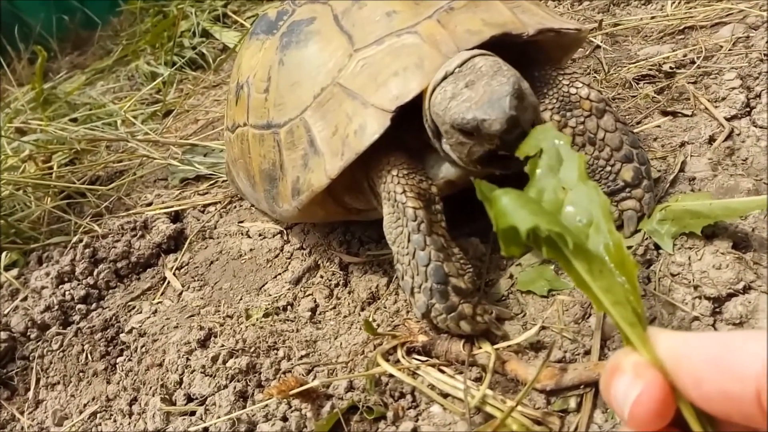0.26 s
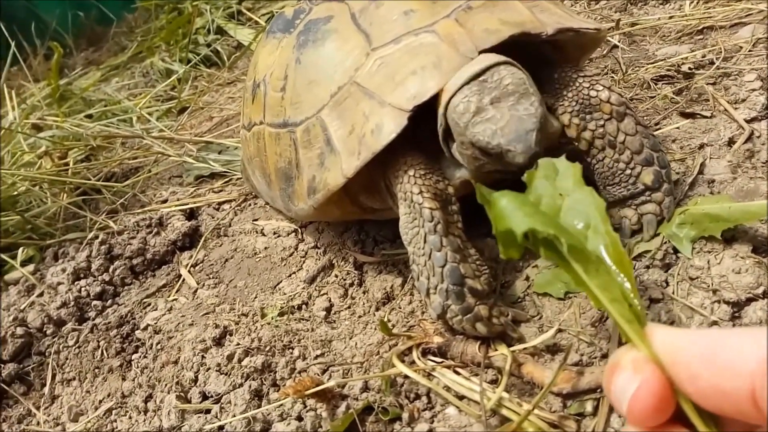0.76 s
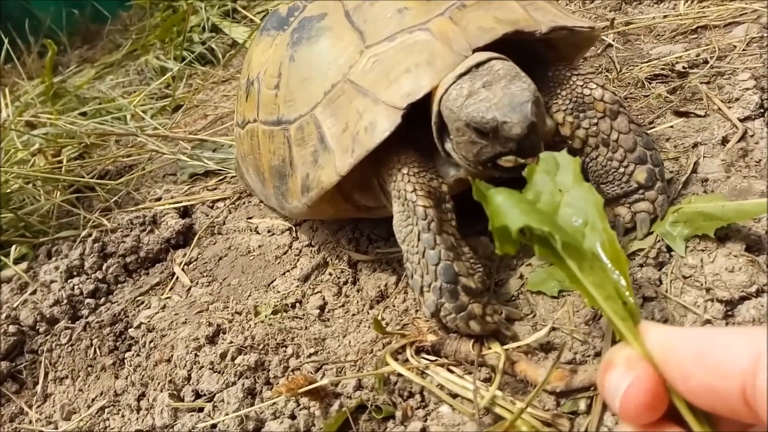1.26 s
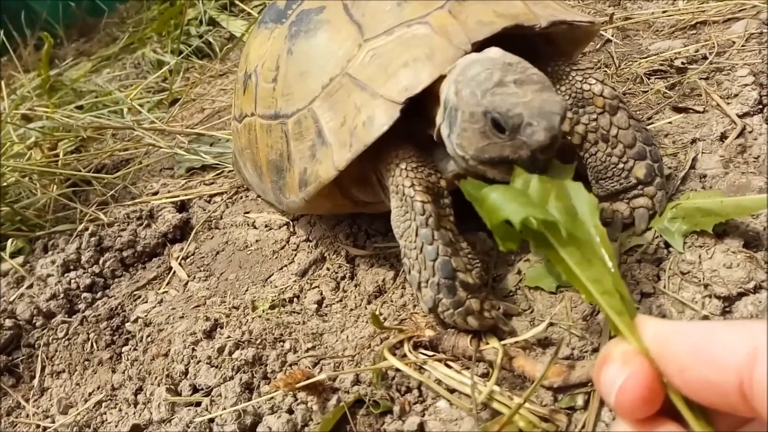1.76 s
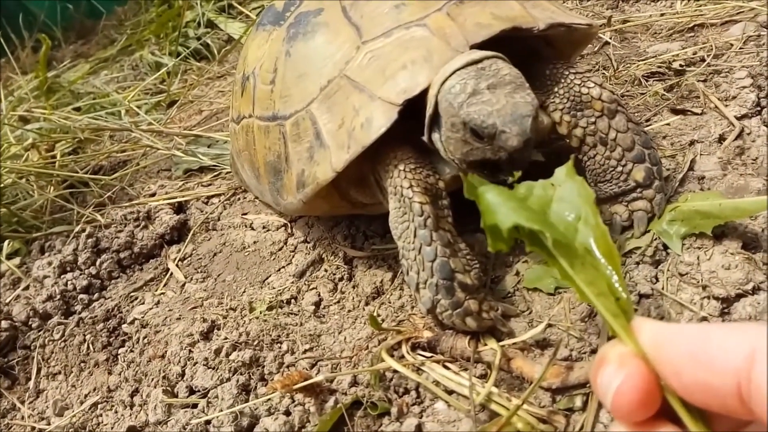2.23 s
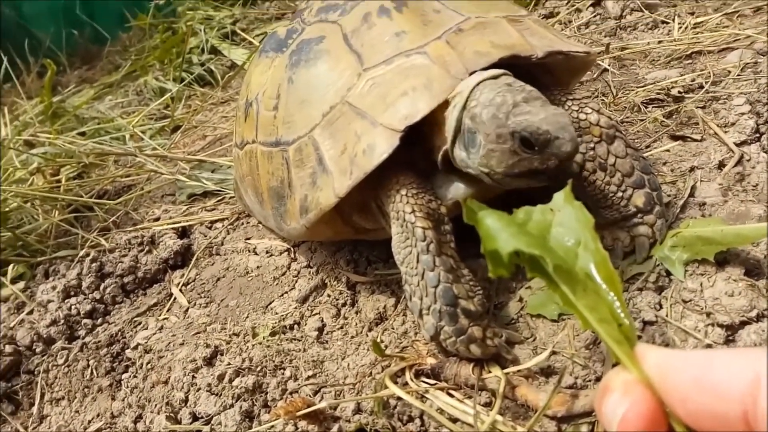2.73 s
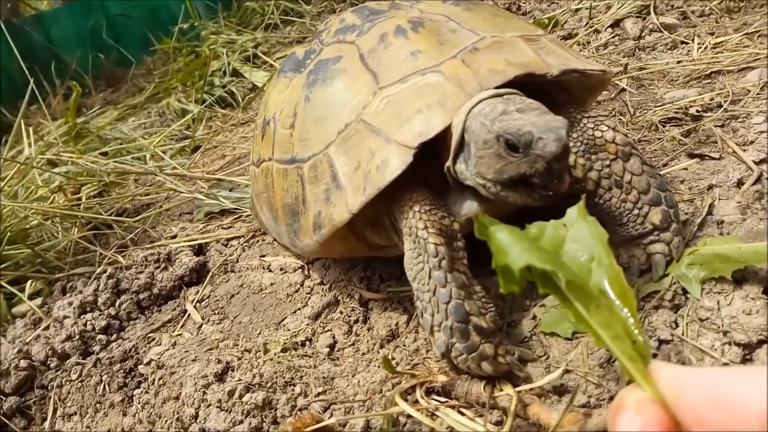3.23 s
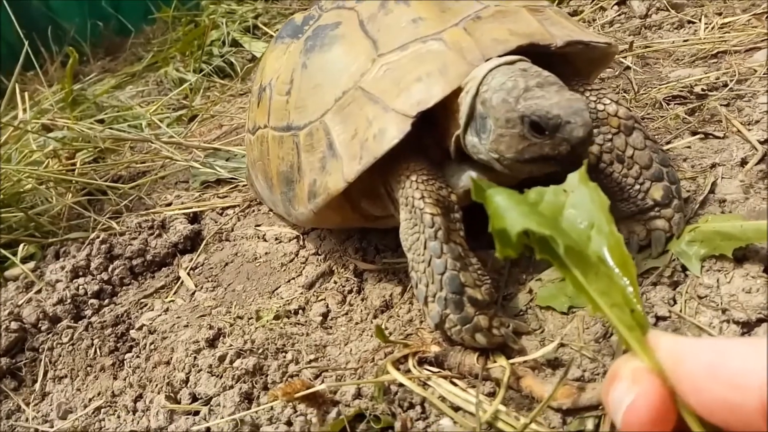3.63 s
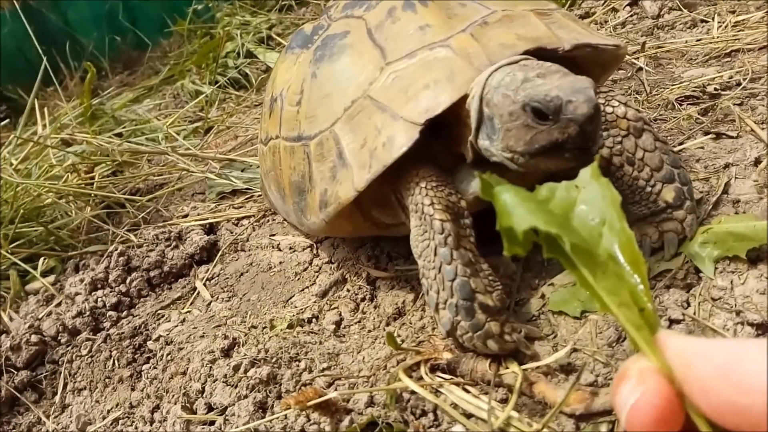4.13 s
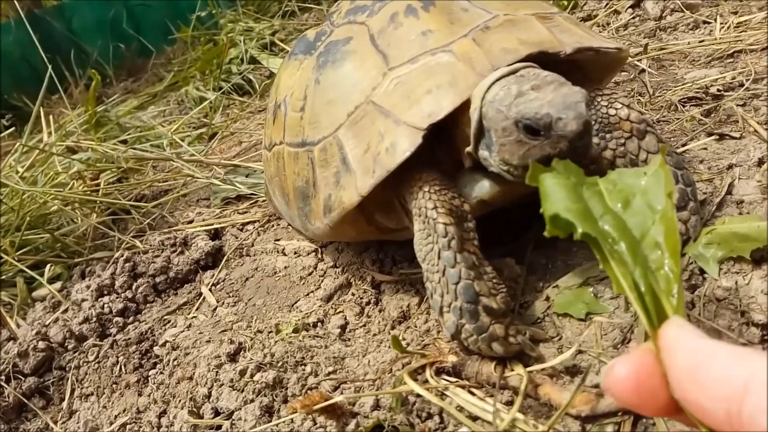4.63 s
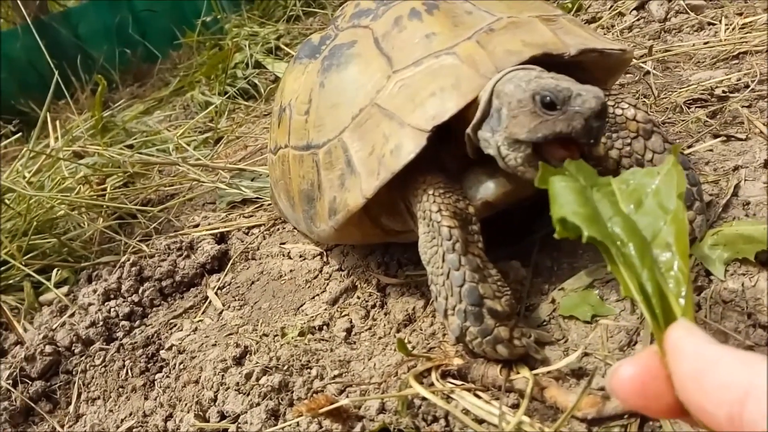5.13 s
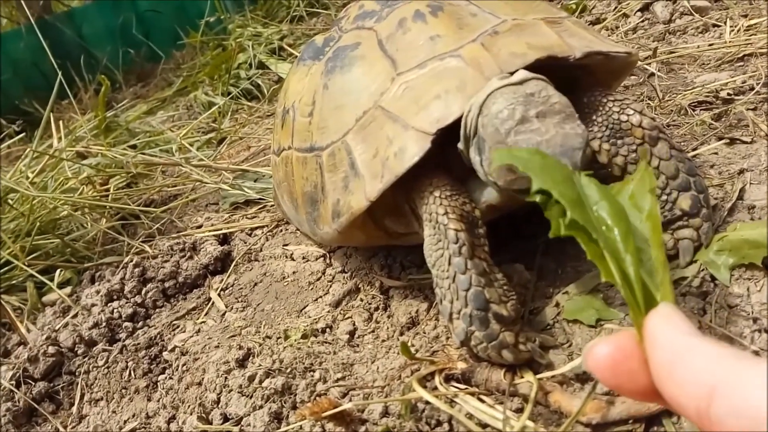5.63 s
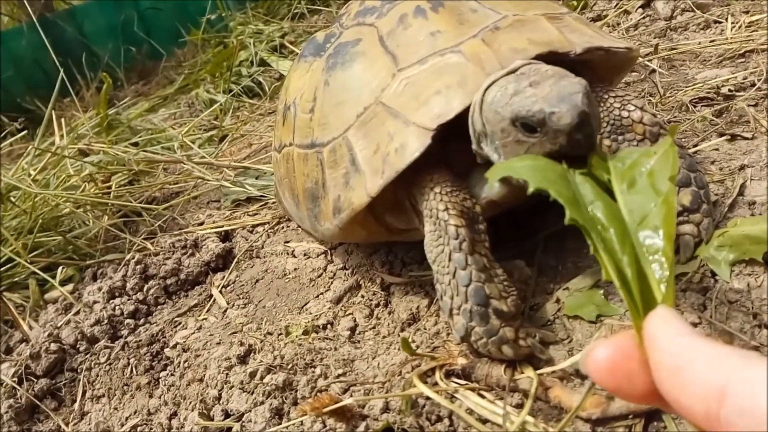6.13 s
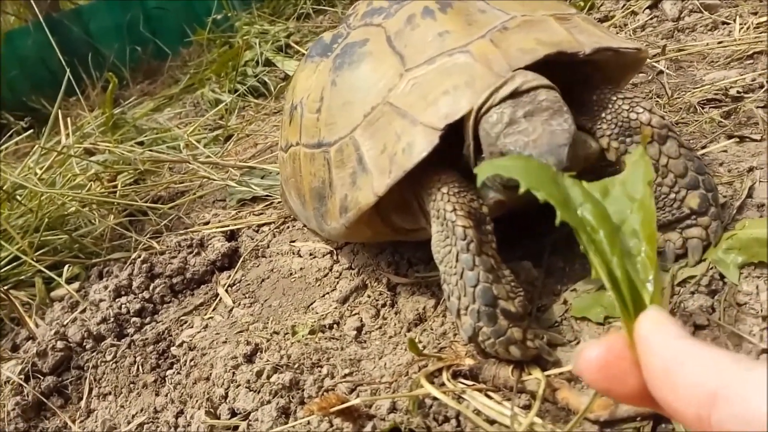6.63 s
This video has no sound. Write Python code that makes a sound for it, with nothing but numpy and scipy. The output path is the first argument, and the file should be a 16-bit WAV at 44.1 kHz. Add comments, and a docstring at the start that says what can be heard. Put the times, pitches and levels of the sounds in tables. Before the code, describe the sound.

Close, crisp snaps and crackles of a tortoise eating a leaf outdoors, with three distant caws and a brief finger bump on the microphone.

```python
"""Outdoors on dry ground, a tortoise bites and tears a crisp leaf a hand's width from a camera.
The ribs snap by brittle fracture and the fibres crackle in runs of tiny clicks. Some way off a crow
caws three times, its pulsing voice filtered by throat and beak. A finger knocks on the camera's case
and rubs its microphone ports. Behind it all lie a rumble and hush of air, faint high whistles and
the harmonic hum of a distant engine, slowly sinking in pitch."""
import sys
import numpy as np
from scipy import signal
from scipy.fft import rfft, irfft, next_fast_len
from scipy.io import wavfile
from scipy.ndimage import uniform_filter1d

SR = 44100
rng = np.random.default_rng(int(sys.argv[2]) if len(sys.argv) > 2 else 0)


def transcribe(u):
    """Save the signal u as a 16-bit wav file named by the first command-line argument.

    u: samples, shape (n,) or (channels, n), limited to [-1, 1]; the rate is SR.
    q: integer samples, one column per channel.
    """
    v = np.clip(np.atleast_2d(u).T, -1, 1)
    q = np.round(v * 32767).astype(np.int16)
    wavfile.write(sys.argv[1], SR, q)


N = 302967
T = np.arange(N) / SR


def amp(db):
    """Amplitude ratio of a level in decibels."""
    return 10 ** (np.asarray(db) / 20)


def unit_rms(x):
    """Normalisation to rms 1."""
    return x / np.sqrt(np.mean(x ** 2) + 1e-30)


def at_freq(points, hz):
    """Interpolation of (f/Hz, value) points on a logarithmic frequency axis."""
    f, value = np.transpose(points)
    return np.interp(np.log(hz + 1), np.log(f + 1), value)


def swells(rows, rest_db):
    """Power sum of Gaussian envelopes (t/s, half width/s, level/dB) and a resting level."""
    power = sum((amp(db) * np.exp(-((T - s) / width) ** 2)) ** 2 for s, width, db in rows)
    return np.sqrt(amp(rest_db) ** 2 + power)


def held(start, end, db, fade_s):
    """Trapezoidal envelope: fades in, holds, fades out."""
    return amp(db) * np.clip(np.minimum(T - start, end - T) / fade_s, 0, 1)


def add(mix, s, sound):
    """Superposition of a sound on the stereo mix at time s."""
    part = mix[:, max(round(s * SR), 0):][:, :sound.shape[-1]]
    part += sound[..., :part.shape[1]]


def delay(x, s):
    """Circular time shift by s seconds."""
    return np.roll(x, round(s * SR), axis=-1)


def pan(lr_db):
    """Constant-power gains for a level difference L-R, left minus right."""
    return unit_rms(amp(np.array([[lr_db / 2], [-lr_db / 2]])))


def colour(x, points, size=4096):
    """Minimum-phase filter with the response (f/Hz, gain/dB)."""
    log_gain = np.log(amp(at_freq(points, abs(np.fft.fftfreq(size, 1 / SR)))))
    taps = np.fft.ifft(np.exp(np.conj(signal.hilbert(log_gain)))).real[:size // 2]
    return signal.oaconvolve(np.atleast_2d(x), taps[None], axes=1)[:, :x.shape[-1]]


def band(x, lo_hz, hi_hz, order=3):
    """Butterworth band-pass."""
    return signal.sosfilt(signal.butter(order, [lo_hz, hi_hz], "band", fs=SR, output="sos"), x)


def resonate(x, hz, width_hz, stages=1):
    """Damped resonators of unit gain in cascade; their frequency may vary in time."""
    turn = np.exp(2j * np.pi * np.cumsum(hz * np.ones(x.shape[-1])) / SR)
    pole = np.exp(-np.pi * width_hz / SR)
    for _ in range(stages):
        x = 2 * (turn * signal.lfilter([1 - pole], [1, -pole], x / turn + 1e-18)).real
    return x


def wander(rate_hz, n=N):
    """Random modulation: low-pass noise of rms 1."""
    size = next_fast_len(N)
    low_pass = np.exp(-(np.fft.rfftfreq(size, 1 / SR) / rate_hz) ** 2)
    return unit_rms(irfft(rfft(rng.standard_normal(size)) * low_pass, size))[:n]


# Reverberation time of the yard: f/Hz, T60/s
YARD_T60 = [(300, 0.059), (1500, 0.2), (4000, 0.24), (8000, 0.19), (16000, 0.049)]
def echoes(x, t60_scale=1, size=256):
    """Reverberation: ground, fence and plants scatter sound into an exponentially decaying tail."""
    hz, t, spectra = signal.stft(rng.standard_normal((2, SR)), SR, nperseg=size)
    decay_db = -60 * t / (t60_scale * at_freq(YARD_T60, hz)[:, None])
    tail = signal.istft(spectra * amp(decay_db), SR, nperseg=size)[1][:, :SR]
    tail *= np.minimum(T[:SR] / 0.0016, 1)
    tail = colour(tail, [(300, -10), (1400, 2.5), (3000, -4.5), (6000, -15), (9000, -7), (16000, -25)])
    return signal.oaconvolve(x.mean(0)[None], unit_rms(tail) / np.sqrt(SR), axes=1)[:, :N]


# Ambient noise spectrum: f/Hz, relative spectral density/dB
AIR_SPECTRUM = [(20, -6), (40, -11), (70, -2), (110, -1), (160, -3), (230, -10), (320, -17), (500, -23.5),
                (1000, -27.5), (2000, -31.5), (4000, -34), (6300, -36.5), (8300, -47.5), (15000, -47.5)]
# Likeness of left and right: f/Hz, correlation/1
AIR_CORRELATION = [(60, 0.68), (130, 0.62), (290, 0.29), (640, 0.16), (2000, 0.06)]
# Envelope of the rumble: t/s, relative level/dB
AIR_SWELL = [(0, -62.5), (4.7, -61.5), (5.4, -58.5), (6.87, -63.5)]
def air(gain_db=2, flutter_db=2.8, crossover_hz=450):
    """Partially coherent noise: a swelling rumble, much alike on both sides, under a diffuse hush."""
    size = next_fast_len(N)
    left, independent = rfft(rng.standard_normal((2, size)))
    hz = np.fft.rfftfreq(size, 1 / SR)
    correlation = at_freq(AIR_CORRELATION, hz)
    right = correlation * left + np.sqrt(1 - correlation ** 2) * independent
    spectrum = np.array([left, right]) * amp(at_freq(AIR_SPECTRUM, hz))
    low_share = 1 / (1 + (hz / crossover_hz) ** 4)
    rumble = irfft(spectrum * low_share, size)[:, :N]
    hush = irfft(spectrum * (1 - low_share), size)[:, :N]
    swell = amp(np.interp(T, *np.transpose(AIR_SWELL)) + flutter_db * wander(8))
    return (rumble * swell + hush * swell.mean()) / np.std(rumble + hush) * amp(gain_db) * pan(0.63)


# Spells of a faint far tone: start/s, end/s, level/dB
FAR_TONE = [(2.903, 3.6, -72), (3.58, 4.173, -70.5)]
def far_tone(hz=975, width_hz=95, fade_s=0.054):
    """Narrow-band noise, heard as a fuzzy pitch at its centre frequency."""
    tone = unit_rms(resonate(rng.standard_normal((2, N)), hz, width_hz, stages=2))
    return tone * sum(held(*row, fade_s) for row in FAR_TONE) * pan(-0.93)


# The engine's main partial: t/s, f/Hz, level/dB
ENGINE_LINE = [(0, 92.9, -50.5), (.85, 94.3, -54.5), (2.6, 92.4, -53.5), (4.149, 89.63, -51.5),
               (5, 88.06, -51.5), (6.25, 86.6, -52), (6.55, 88.2, -53), (6.87, 87.2, -53)]
# Swells of its lower partial: t/s, half width/s, level/dB
UNDERTONE = [(1.8, 0.36, -66), (5.1, 0.5, -58), (6, .55, -57)]
# Its upper partials, re the main one: frequency ratio/1, level/dB
OVERTONES = [(1.3, -12.5), (1.97, -20.5), (2.58, -21.5)]
def engine(under_ratio=0.647, dip_db=-7.5, dip_width_s=0.069, waver_db=2.5, overtone_waver_db=3):
    """Atmospheric fading: the low partials of a distant engine come and go on the moving air."""
    times, hz, db = np.transpose(ENGINE_LINE)
    dips = sum(np.exp(-((T - s) / dip_width_s) ** 2) for s in (0.83, 1.62, 2.26, 2.65, 6.37))
    phase = 2 * np.pi * np.cumsum(np.interp(T, times, hz)) / SR
    gain = amp(np.interp(T, times, db) + dip_db * dips)
    hum = gain * np.sin(phase + 0.058 * wander(3.6)) * amp(waver_db * wander(9.8))
    hum += swells(UNDERTONE, rest_db=-69) * np.sin(under_ratio * phase + 0.089 * wander(6.3))
    for ratio, over_db in OVERTONES:
        fading = amp(over_db + overtone_waver_db * wander(3.8))
        hum += gain * fading * np.sin(ratio * phase + wander(3.5))
    return np.sqrt(2) * hum * pan(1)


# A second, brief hum: start/s, end/s, level/dB
DRONE = (0.038, 0.725, -50.5)
def drone(hz=74, sub_db=-17, fade_s=0.11):
    """A low pure tone with a subharmonic at a third of its frequency."""
    phase = 2 * np.pi * hz * T
    hum = np.sin(phase) + amp(sub_db) * np.sin(phase / 3)
    return np.sqrt(2) * held(*DRONE, fade_s) * hum * pan(1)


# Thin high whistles: start/s, end/s, start f/Hz, end f/Hz, level/dB
WHISTLES = [(1.671, 1.794, 5600, 5630, -70.5), (2.549, 2.766, 6060, 6050, -76.5),
            (3.219, 3.507, 5900, 6060, -74), (4.813, 4.909, 5880, 5930, -69.5)]
def whistles(width_hz=330, waver=0.019):
    """Noise through a narrow, wavering resonance gives faint whistles of nearly level pitch."""
    out = np.zeros((2, N))
    for start, end, from_hz, to_hz, db in WHISTLES:
        t = np.arange(start, end, 1 / SR)
        hz = np.interp(t, [start, end], [from_hz, to_hz]) * (1 + waver * wander(24, len(t)))
        tone = resonate(rng.standard_normal((2, N))[:, :len(t)], hz, width_hz, stages=2)
        add(out, start, amp(db) * unit_rms(tone) * signal.windows.tukey(len(t), 0.5) * pan(-10))
    return out


# Strokes of skin over the ports: peak t/s, half width/s, relative level/dB
STROKES = [(.7, 0.64, -75), (1.95, 0.21, -68.5), (2.7, 0.51, -78), (2.868, 0.042, -50.5),
           (2.935, 0.11, -56), (3.05, 0.045, -51.5), (3.155, 0.024, -61.5), (3.55, 0.59, -70.5),
           (5.0, .18, -76), (5.72, 0.16, -69.5), (6.28, 0.076, -75.5), (6.47, 0.029, -66), (6.66, 0.1, -70)]
# Spectrum of the dull rub: f/Hz, gain/dB
RUB_SPECTRUM = [(80, -13), (200, -0.5), (370, -1.5), (620, -8), (780, -2.5), (1000, -3), (1300, -16),
                (2500, -17), (5000, -49)]
def finger_rub(port_hz=5650, port_width_hz=1150, grain_db=1.5, rub_grain_db=3.5, hiss_db=-1, firm_db=-56):
    """Friction noise: a grainy hiss in the right port's resonance and a dull rub on the left."""
    friction = rng.standard_normal((2, N)) * amp(grain_db * wander(130))
    skin = resonate(friction, port_hz, port_width_hz)
    light = unit_rms(resonate(skin, port_hz, port_width_hz))
    firm = unit_rms(band(skin, 2550, 7600, order=4))
    touch = swells(STROKES, rest_db=-82)
    firmness = touch / (touch + amp(firm_db))  # pressing harder widens the hiss and brings in the rub
    hiss = np.sqrt(1 - firmness ** 2) * light + firmness * firm
    rub = unit_rms(colour(rng.standard_normal(N) * amp(rub_grain_db * wander(120)), RUB_SPECTRUM))
    return touch * (hiss * amp(hiss_db) * pan(-14) + rub * firmness * pan(27))


# Modes of the camera's case: f/Hz, relative level/dB, T60/s
CASE_MODES = [(253, -20.5, .02), (338, -23.5, 0.03), (516, -32.5, 0.055), (727, -25, 0.022),
              (940, -56, .008), (1460, -32, 0.027)]
# Knocks of the finger: t/s, gain/dB
KNOCKS = [(2.8242, -2.5), (2.862, -22), (2.886, -22.5)]
def finger_knocks():
    """Impulse response: each knock sets the damped modes of the case ringing, on the left."""
    out = np.zeros((2, N))
    t = T[:SR // 10]
    modes = sum(amp(db - 60 * t / t60) * np.cos(2 * np.pi * hz * t) for hz, db, t60 in CASE_MODES)
    knock = band(modes, 85, 980, order=2)
    for s, db in KNOCKS:
        add(out, s, amp(db) * knock)
    return out * pan(27)


def voice_source(t, hz, rough, jitter=0.0503, flutter_db=3.5, harmonics=19):
    """Quasi-periodic excitation: jittery pulses mixed with a share, rough, of puffs of breath."""
    cycles = np.cumsum(hz * (1 + jitter * rough * wander(155, len(t)))) / SR
    # on the way across the yard each harmonic fades in and out on its own
    fades_db = flutter_db * rng.standard_normal((harmonics + 1, 20))
    moments = np.linspace(0, t[-1], 20)
    pulses = unit_rms(sum(amp(np.interp(t, moments, fades_db[k])) * np.cos(2 * np.pi * k * cycles)
                          for k in range(1, harmonics + 1)))
    airflow = 0.19 + np.exp(-(cycles % 1) / 0.35)
    puffs = unit_rms(band(airflow * rng.standard_normal(N)[:len(t)], 300, 5600))
    shimmer = 1 + 0.15 * wander(90, len(t))
    return (1 - rough) * pulses * shimmer + rough * puffs


# The caw as heard, throat formants plus the microphone port's resonance near 5.9 kHz: f/Hz, gain/dB
CAW_SPECTRUM = [(300, -46), (600, -9), (800, -1), (1200, 0), (1700, -2.5), (2400, -2), (2700, -2.5),
                (3200, -25), (4500, -26.5), (5900, -9.5), (7000, -50)]
def caw(length, rise_s, top_hz, sag_hz_per_s, db, open_hz, treble_db,
        attack_s=0.063, sag_db_per_s=12, release_s=0.032, treble_hz=1680, shut_db=-31, beak_db=8):
    """Source-filter model: pitch and beak resonance rise together, then sink as the voice roughens."""
    t = np.arange(0, length, 1 / SR)
    opening = np.sin(np.pi / 2 * np.minimum(t / rise_s, 1))
    past_top_s = np.maximum(t - rise_s, 0)
    end_drop = 1 - 0.101 * np.exp((t - length) / 0.0365)  # the pitch falls as the call gives out
    sinking = (1 - sag_hz_per_s * past_top_s / top_hz) * end_drop
    pitch_hz = top_hz * (0.8 + 0.2 * opening) * sinking
    beak_hz = open_hz * (0.81 + 0.19 * opening) * sinking ** 0.37
    voice = colour(voice_source(t, pitch_hz, rough=0.28 + 0.22 * (t / length) ** 2), CAW_SPECTRUM)[0]
    dull = signal.sosfiltfilt(signal.butter(2, treble_hz, fs=SR, output="sos"), voice)
    voice = dull + amp(treble_db + shut_db * (1 - opening)) * (voice - dull)  # a shut beak muffles
    voice += amp(beak_db) * resonate(voice, beak_hz, width_hz=330)
    gate = np.minimum(t / attack_s, 1) * np.minimum((length - t) / release_s, 1)
    running_rms = np.sqrt(abs(uniform_filter1d(voice ** 2, SR // 30)) + 1e-12)
    return gate * amp(db - sag_db_per_s * past_top_s) * voice / running_rms


# Caws: t/s, length/s, rise/s, top f/Hz, sag/(Hz/s), level/dB, open beak f/Hz, treble/dB, right lag/s
CAWS = [(1.786, 0.37, 0.12, 417, 397.6, -52, 2050, -5, 0.00024),
        (2.461, 0.41, .1, 399.8, 191.8, -56, 1710, 1, 0.00023),
        (3.185, .35, .08, 413.3, 324.8, -54, 1900, -8, 0.00038)]
def crow(echo_db=-17):
    """Path difference: the crow moves about on the left, so its calls reach the right port later."""
    out = np.zeros((2, N))
    for start, *shape, lag_s in CAWS:
        voice = caw(*shape)
        add(out, start, np.array([voice, delay(voice, lag_s)]))
    return out + amp(echo_db) * echoes(out[:1], t60_scale=3)


# Runs of tearing fibres: peak t/s, swell/s, fade/s, level/dB, beak hollow f/Hz, leaf ring f/Hz
TEARS = [(0.875, 0.0012, 0.025, -44, 696, 5600), (1.985, .004, 0.0045, -36.5, 760, 5720),
         (4.899, 0.0077, 0.016, -38, 1930, 4500), (4.985, 0.0054, 0.055, -55, 2800, 4560),
         (5.083, 0.02, 0.019, -36, 944, 4610), (5.27, 0.0097, 0.056, -52.5, 930, 4300),
         (5.756, .045, 0.019, -48.5, 2020, 4900), (6.452, 0.014, 0.032, -63.5, 1050, 6300),
         (6.708, .001, 0.0041, -31, 2810, 4340)]
# Spectrum of a fibre's click: f/Hz, gain/dB
FIBRE_SPECTRUM = [(300, -16), (600, -15.5), (950, -12), (2000, -4.5), (3000, -10.5), (4500, 0),
                  (5800, -5.5), (7500, -15.5), (10000, -31.5), (16000, -54)]
def fibre_tears(fibres_per_s=3000, spread_db=7.5, fade_db=19, hollow_db=-10, ring_db=-3, size=4096):
    """Shot noise: fibres give way in random clicks that ring the leaf and the tortoise's hollow beak."""
    out = np.zeros((2, N))
    for peak_s, swell_s, fade_s, db, hollow_hz, ring_hz in TEARS:
        t = T[:size] - swell_s
        force = amp(db - fade_db * np.maximum(-t / swell_s, t / fade_s))
        breaks = rng.random(size) < fibres_per_s / SR
        strength = amp(spread_db * np.minimum(rng.exponential(1, size), 3))
        polarity = rng.choice([-1, 1], size) + 0.52 * rng.standard_normal((2, size))
        clicks = force * breaks * strength * polarity
        hollow = unit_rms(resonate(clicks, hollow_hz, width_hz=200, stages=2))
        ring = unit_rms(resonate(clicks, ring_hz, width_hz=650, stages=2))
        run = unit_rms(colour(clicks, FIBRE_SPECTRUM)) + amp(hollow_db) * hollow + amp(ring_db) * ring
        add(out, peak_s - swell_s, unit_rms(run) * np.sqrt(np.mean(force ** 2)) * pan(-4))
    return out


# Sharp clicks, leaf ribs snapping and, at 2.82 s, the tick of the finger's knock:
# t/s, level/dB, ring f/Hz, relative body/dB, relative edge/dB, ring L-R/dB
CLICKS = [(0.435, -45, 6130, -28, -30, -4), (0.8487, -48.5, 5050, -24, -1, -29),
          (0.8529, -43, 6100, -4, -3.5, 30), (0.8628, -43.5, 5230, -25, -7, -22),
          (0.8751, -34.5, 5800, -12, -10, -3), (0.8837, -47, 5260, -6, -12, -1),
          (1.0704, -61, 5000, -22, -17, -6), (1.981, -34, 5600, -14, -14, 1),
          (1.984, -30.5, 6150, -19, -6.5, -10), (2.8227, -28, 5460, -22.5, -21, -17),
          (3.4942, -62.5, 5800, 7, 6.5, 21), (4.897, -24.5, 4130, -17.5, -23, -4),
          (4.913, -55, 4960, 11.5, -22, -16), (4.9787, -51, 4440, -2, -26, -8),
          (5.0667, -43.5, 3900, -15, -32, 12), (5.0748, -39, 4044, -3.5, -42, -11),
          (5.0854, -33, 4700, -6, -47, -18), (5.2632, -50, 4300, -32, -27, -5),
          (5.2908, -51, 5400, -6, -33, 2), (5.713, -45, 5350, -10.5, -14, -6),
          (5.7452, -41.5, 5200, -21, -12, -14), (5.7557, -34.5, 5170, -11.5, -18, -6),
          (6.2967, -56, 4950, -18, -34, -6), (6.4447, -51, 6540, -11.5, -24, -4.5),
          (6.7078, -28, 5840, -27, -16, 17), (6.7085, -30.5, 4980, -2.5, -12, -4)]
def sharp_clicks(burst_s=0.00039, lead_db=-19, lead_s=0.0011, tail_db=-17, tail_s=0.0014,
                 edge_trim_db=-1, size=1024):
    """Impulsive excitation: a rib's brittle fracture, or the finger's tick, is a broadband burst."""
    out = np.zeros((2, N))
    t = T[:size] - 0.003
    burst_gain = np.sqrt(0.002 * SR / size)  # the level holds for the energy spread over 2 ms
    burst = np.exp(-abs(t) / burst_s) * (t >= 0)
    # in a rib, a few fibres give before the break and splinters follow it
    lead = amp(lead_db) * np.exp(-abs(t) / lead_s)
    skirts = np.where(t < 0, lead, amp(tail_db) * np.exp(-abs(t) / tail_s))
    for s, db, hz, body_db, edge_db, lr_db in CLICKS:
        burst_noise, skirt_noise = rng.standard_normal((2, size))
        per_side = rng.standard_normal((2, size))
        crack = (burst_noise + 0.093 * per_side) * burst + (skirt_noise + per_side) * skirts
        ring = unit_rms(band(resonate(crack, hz, width_hz=1300), 0.78 * hz, 1.346 * hz)) * pan(lr_db)
        bounce = 0.17 * delay(crack, 0.0026)  # the ground reflects the lower band
        body = unit_rms(band(crack + bounce, 1000, 3320, order=4)) * pan(0.16 * lr_db)
        edge = unit_rms(band(crack, 7400, 14000, order=2)) * pan(0.5 * lr_db)
        click = ring + amp(body_db) * body + amp(edge_db + edge_trim_db) * edge
        add(out, s + t[0], burst_gain * amp(db) * click)
    return out


def scene(near_echo_db=-21):
    """Superposition: the leaf close by, a little to the right, over crow, background and finger."""
    near = sharp_clicks() + fibre_tears()
    direct = np.array([delay(near[0], 0.00004), near[1]])
    reflected = amp(near_echo_db) * echoes(near)
    distant = crow() + whistles() + engine() + drone() + air() + far_tone()
    return direct + reflected + distant + finger_rub() + finger_knocks()


def record(dry, cutoff_hz=15800):
    """Band limiting by a linear-phase low-pass filter."""
    taps = signal.firwin(255, cutoff_hz, window=("kaiser", 9), fs=SR)
    return signal.oaconvolve(dry, taps[None], "same", axes=1)


dry = scene()
out = record(dry)
transcribe(out)
```